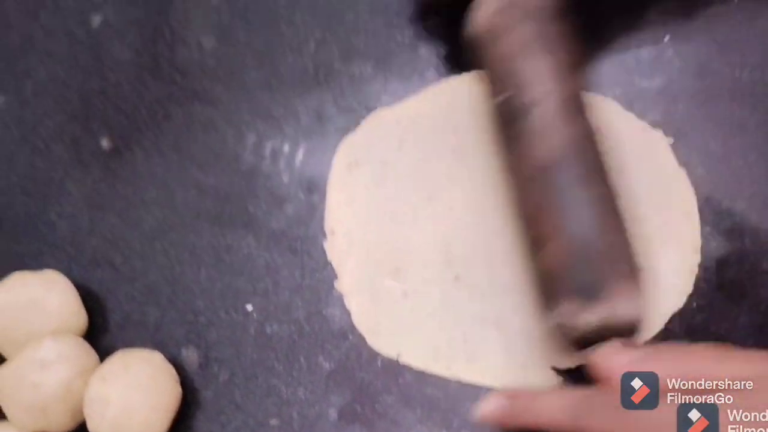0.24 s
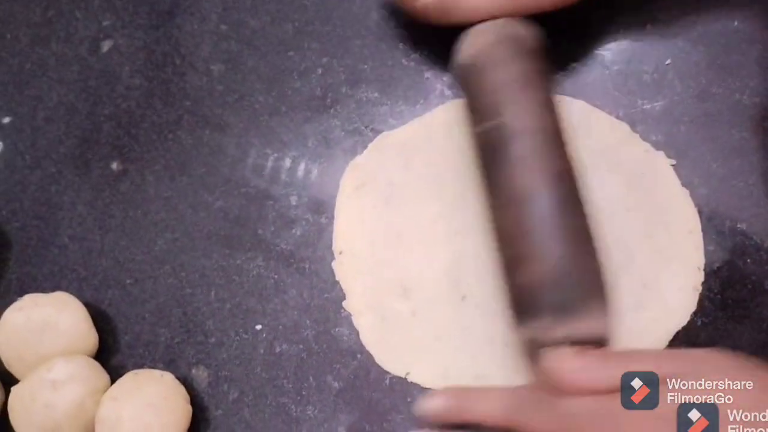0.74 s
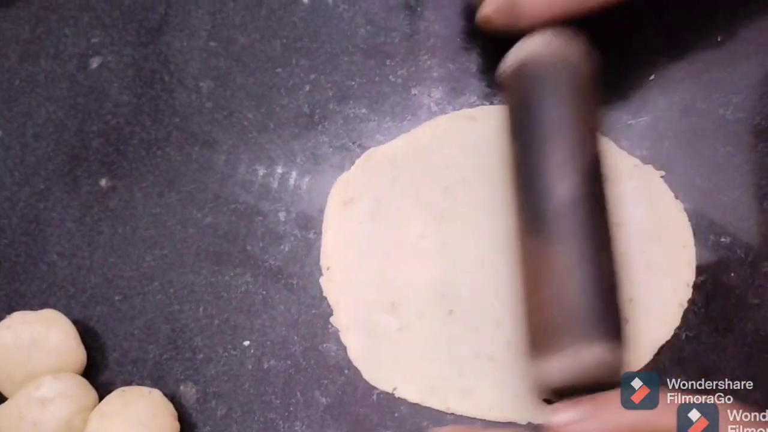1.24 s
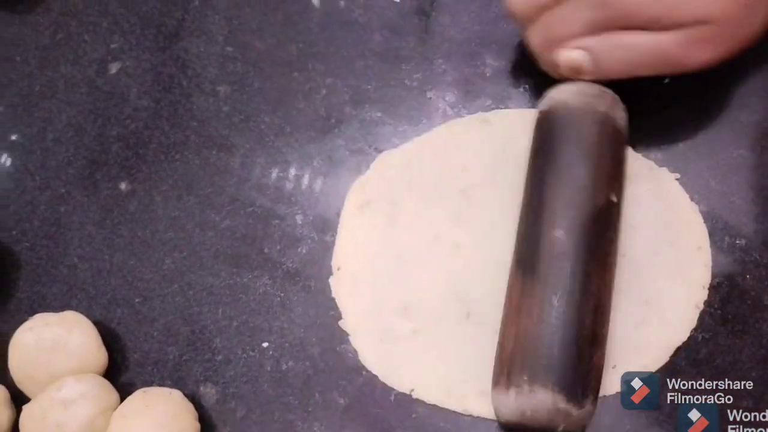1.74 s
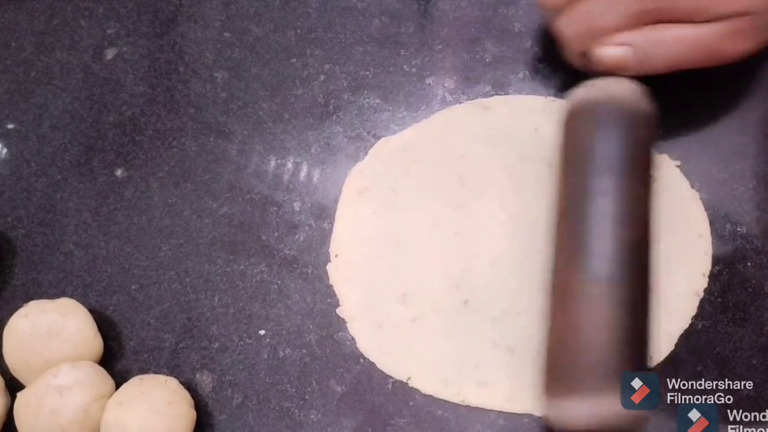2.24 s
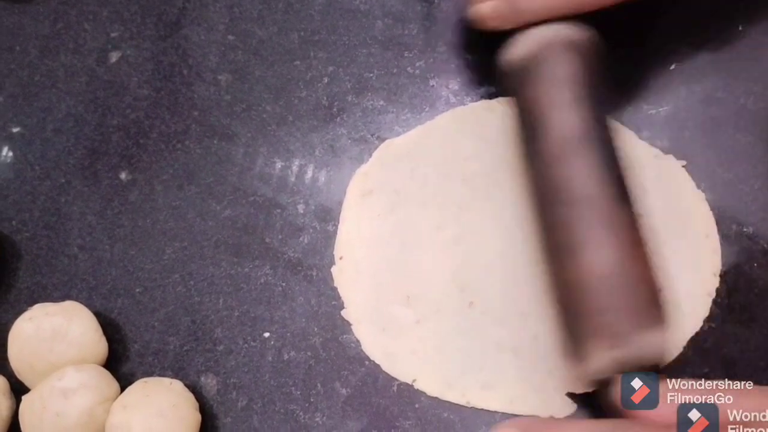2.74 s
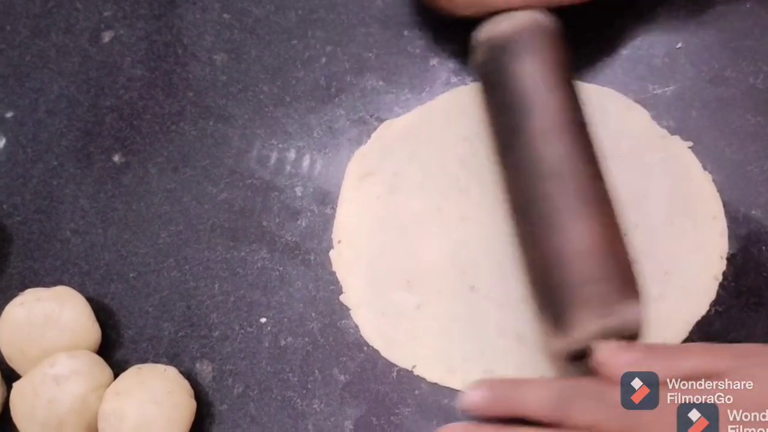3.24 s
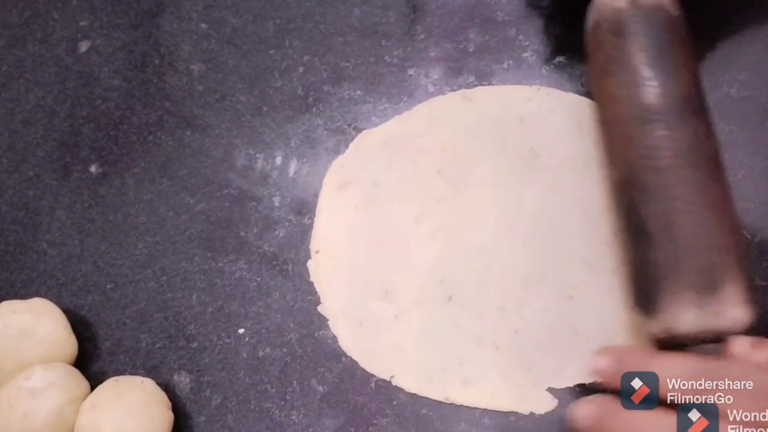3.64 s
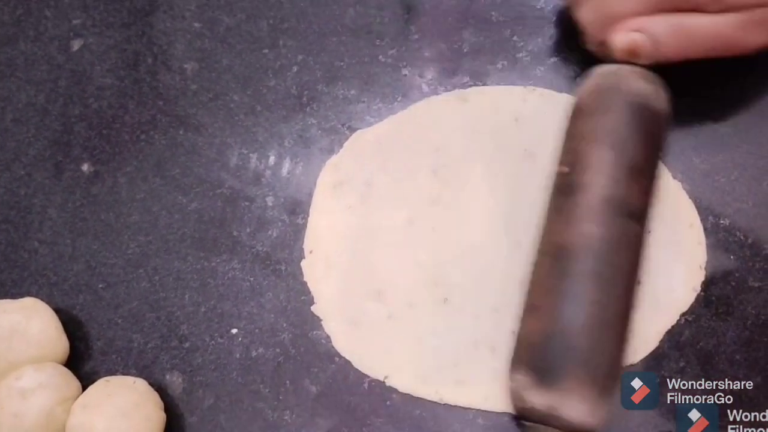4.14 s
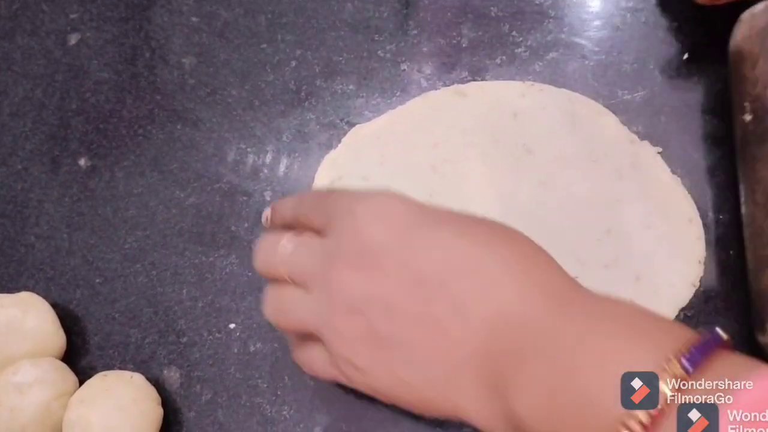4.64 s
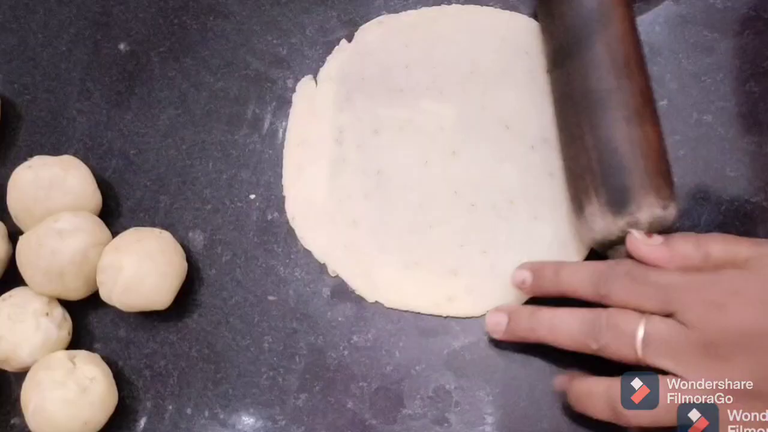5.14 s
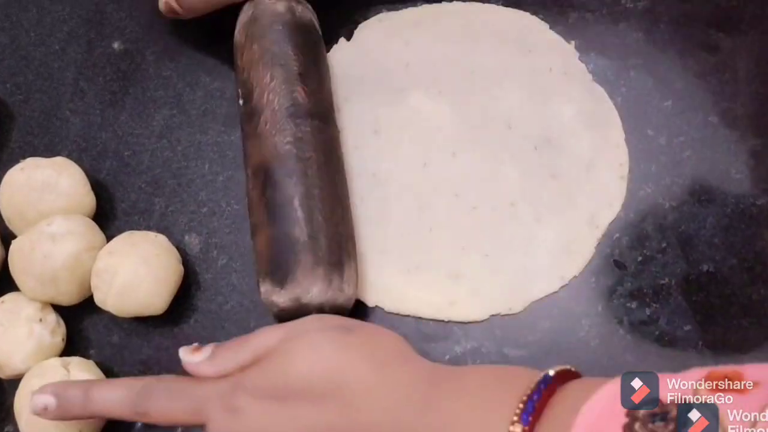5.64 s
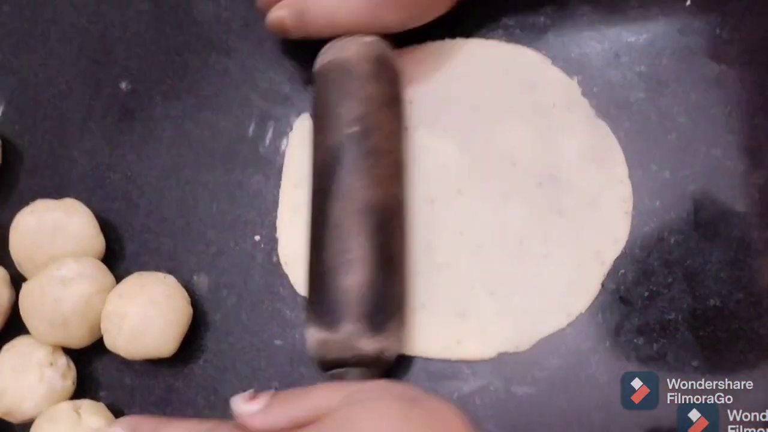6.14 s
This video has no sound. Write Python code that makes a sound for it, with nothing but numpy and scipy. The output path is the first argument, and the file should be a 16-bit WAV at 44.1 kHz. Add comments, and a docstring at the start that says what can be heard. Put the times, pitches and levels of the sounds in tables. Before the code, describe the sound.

A wooden rolling pin knocks unevenly on a stone counter over an appliance hum in an echoing kitchen, with faint bangle clicks.

```python
"""A bare, echoing kitchen, heard on a stereo microphone. A wooden rolling pin knocks on a stone counter,
a little nearer the right port; pin and counter ring briefly together and the room answers.
Bangles click, each click followed by a diffuse, fluttering ring near 7.5 kHz on the right.
A broad appliance hum fills the room and feeds its two lowest standing waves, which boom after each knock.
Near the end the sound cuts out for a moment and fades back in."""
import sys
import numpy as np
from scipy import signal
from scipy.fft import rfft, irfft
from scipy.io import wavfile
from scipy.ndimage import uniform_filter1d

SR = 44100
rng = np.random.default_rng(int(sys.argv[2]) if len(sys.argv) > 2 else 0)


def unload_audio(sound):
    """Save the sound as a 16-bit wav file, at the path given as the first command line argument."""
    columns = np.transpose(np.atleast_2d(sound))
    # keep every value between -1 and 1, then stretch to whole-number steps
    steps = np.round(np.clip(columns, -1, 1) * 32767)
    wavfile.write(sys.argv[1], SR, steps.astype(np.int16))


N = 281358

# appliance spectrum: (frequency [Hz], relative density [dB])
HUM_SPECTRUM = [(15, -44.5), (55, -30.5), (85, -7.5), (120, -11.5), (200, -5.5), (300, -6), (420, -12),
                (750, -12), (1500, -17), (3000, -28.5), (5700, -48), (7500, -45), (10000, -49),
                (15600, -52)]
# hum in the room: (time [s], level [dB])
HUM_LEVELS = [(0, -42.5), (1, -42), (4, -41.5), (5.2, -42.5), (5.7, -41), (6.38, -41)]
# standing waves, the two that drone first: (frequency [Hz], width [Hz], gain [dB])
ROOM_MODES = [(145, 3.1, 5), (86.4, 4.4, 10.5), (215.2, 12.7, 9), (254, 6.2, -2), (297.3, 10, 12),
              (378, 10, 7), (501.7, 8.5, 9.5), (580, 10, -1), (619, 10, -2), (740.5, 9, 7.5),
              (794, 5.6, 6.5), (852, 10, 0)]
# upper droning wave between knocks: (time [s], level [dB])
UPPER_WAVE_LEVELS = [(0, -47.5), (.3, -47), (.75, -43), (.97, -46.5), (1.14, -40.5), (1.28, -56),
                     (1.6, -36.5), (1.9, -44.5), (2.22, -39), (2.5, -50.5), (2.8, -42), (3.2, -45.5),
                     (3.8, -46), (4.1, -47.5), (4.33, -40.5), (4.75, -43), (5.0, -58), (5.12, -47.5),
                     (5.8, -43.5), (6.0, -66), (6.3, -44)]
# boom of the upper, then the lower wave: (build-up [s], t60 [s], level against the knock's boom [dB])
BOOM_SHAPES = [(.08, .4, 0), (.02, 0.95, -1)]
# bangles touching: (time [s], peak before panning [dB], rattle centre [Hz], rattle width [Hz],
# after-ring against the peak [dB], rattle length [s])
BANGLE_TOUCHES = [(0.057, -48.5, 5000, 4000, -38, 0.004), (.621, -48.5, 4960, 4000, -28, 0.0062),
                  (.996, -51.5, 5900, 4000, -29, 0.0039), (1.037, -38.5, 7700, 12200, -17, 0.0077),
                  (2.571, -47, 7600, 3500, -38, 0.0073), (2.669, -59.5, 7900, 2953, -35, .012),
                  (3.082, -50.5, 6000, 5000, -27, 0.0041), (3.102, -42.5, 8040, 7000, -21, 0.01),
                  (3.508, -54.5, 5400, 3950, -22, 0.0062), (3.566, -49, 7900, 7000, -34, 0.014),
                  (4.204, -55, 7000, 4980, -28, 0.0046)]
# diffuse ring heard on the right after each click: (frequency [Hz], relative level [dB], t60 [s])
AFTER_RING = [(7305, -13.5, 0.21), (7670, 1, 0.3), (7300, -3.5, .3), (8680, 0.5, .1), (14200, -8, 0.1)]
# diffuse room tail: (frequency [Hz], t60 [s], relative level [dB])
ROOM_TAIL = [(59.3, 1, -9), (160, 0.814, 2.5), (420, 0.63, 1), (1037, 0.68, 1), (1870, 0.74, -10.5),
             (2900, 0.93, -4.5), (7540, 0.6, 3.5), (15000, 0.28, 0)]
# first echoes off the walls: (delay [s], relative level [dB])
WALL_ECHOES = [(0.023, -15.5), (0.028, -13.5), (.036, -13)]
# pin against stone: (time [s], wood peak [dB], hardness as low-pass cutoff [Hz], lowest mode's boost [dB],
# crack [dB], treble tick [dB], room gain [dB], standing-wave boom [dB])
PIN_BLOWS = [(.385, -18, 325, 5, -60, -56, 2, -43), (0.472, -35.5, 295, 14, -67, -78, 18.5, -51),
             (1.3613, -3, 1330, 1.5, -21, -46, 5.5, -36), (2.8947, -10.5, 670, 5, -35, -54, 3.5, -37),
             (3.8648, -5.5, 1120, 2, -21.5, -47.5, 4.5, -37), (4.719, -22, 1070, -8, -50, -72, 5.5, -56),
             (4.766, -25.5, 1090, -9.5, -52, -74, 5.5, -66), (4.794, -29, 1400, -0.5, -59, -78, -3, -69),
             (4.821, -34, 499, -3, -65, -78, 1, -73), (5.236, -37, 250, -6, -72, -82, 1, -44)]
# pin and counter, quickly damped by hands and dough: (frequency [Hz], relative level [dB], t60 [s])
PIN_MODES = [(262.6, -5, 0.025), (411, -18, 0.0071), (536, -9.5, 0.047), (813, 0, 0.017), (1167, 5, 0.0077),
             (1463, 1, 0.018), (1988, -1.5, 0.052), (2220, -20, .015), (2750, -24.5, 0.011)]
# diffuse sound at the microphone: (frequency [Hz], left-right correlation [-1 to 1])
PORT_LIKENESS = [(60, 0.9), (110, 1), (200, 0.92), (380, 0.89), (700, 0.48), (1290, -0.062), (2380, 0.079),
                 (4400, -0.11), (8120, 0.05), (15000, -0.098)]
# colour of the microphone ports: (frequency [Hz], left minus right [dB])
PORT_BALANCE = [(60, 1.5), (110, -2.5), (200, -1), (380, 2.5), (700, -2.5), (1290, -0.5), (2380, -0.5),
                (4400, -7.5), (8120, -7), (15000, 1.5)]

LOWER_WAVE_DB = -56.5
SPLASHBACK_S, SPLASHBACK_DB = 0.003325, -1.5  # the nearest hard surface returns each blow, duller
CUT_S, RETURN_S, FADE_IN_S = 5.2695, 5.611, 0.063
BAND_LIMIT_HZ = 15700


def gain_of(db):
    """Decibels to gain."""
    return 10 ** (np.asarray(db) / 20)


def unit_rms(x):
    """Scales to rms 1."""
    return x / np.sqrt(np.mean(x ** 2) + 1e-20)


def spectrum_at(points, hz):
    """Reads a spectrum table on a log-frequency axis."""
    f, value = np.transpose(points)
    return np.interp(np.log(hz + 1), np.log(f + 1), value)


def level_curve(rows):
    """A level for every sample."""
    return np.interp(np.arange(N) / SR, *np.transpose(rows))


def add(mix, s, sound):
    """Mixes a sound in at s seconds."""
    part = mix[round(s * SR):][:len(sound)]
    part += sound[:len(part)]


def resonate(x, hz, width):
    """A resonance of gain 1 at its centre."""
    return signal.lfilter(*signal.iirpeak(hz, hz / width, SR), x)


def ring(modes, t, detune):
    """Dying sines, each detuned by its own factor."""
    return sum(gain_of(db - 60 * t / t60) * np.sin(2 * np.pi * hz * k * t)
               for (hz, db, t60), k in zip(modes, detune))


def diffuse(count, size, colour_db):
    """Noise from all around: alike at both ports in the bass, unrelated in the treble."""
    hop = size // 4
    hz, t = np.fft.rfftfreq(size, 1 / SR), np.arange(count // hop + 5) * hop / SR
    a, b, c, d = rng.standard_normal((len(t), len(hz), 4)).T
    left, unrelated = a + 1j * b, c + 1j * d
    likeness = np.clip(spectrum_at(PORT_LIKENESS, hz), -1, 1)[:, None]
    right = likeness * left + np.sqrt(1 - likeness ** 2) * unrelated
    spectra = np.array([left, right]) * gain_of(colour_db(hz[:, None], t))
    return signal.istft(spectra, nperseg=size, noverlap=size - hop)[1][:, :count]


def appliance_hum():
    """Broad appliance noise all around the microphone, with faint drifting patches of colour."""
    def colour_db(hz, t):
        drift = uniform_filter1d(rng.standard_normal((len(t), len(hz))), size=9, axis=0)
        patches = uniform_filter1d(drift, size=15, axis=1)
        return spectrum_at(HUM_SPECTRUM, hz) + 0.95 * unit_rms(patches).T
    return gain_of(level_curve(HUM_LEVELS)) * unit_rms(diffuse(N, 2048, colour_db))


def standing_waves():
    """The room's two lowest waves as wavering tones, alike at both ports; each knock makes them boom."""
    out, t = 0, np.arange(SR) / SR
    levels = level_curve(UPPER_WAVE_LEVELS), LOWER_WAVE_DB
    for (hz, width, _), base_db, (rise, t60, db) in zip(ROOM_MODES, levels, BOOM_SHAPES):
        swell = np.minimum(t / rise, 1) ** 2 * gain_of(db - 60 * np.maximum(t - rise, 0) / t60)
        boom = np.zeros(N)
        for s, *_, boom_db in PIN_BLOWS:
            add(boom, s, gain_of(boom_db) * swell)
        waver_hz = width * .5 * unit_rms(uniform_filter1d(rng.standard_normal(N), size=6000))
        out = out + (gain_of(base_db) + boom) * np.sin(2 * np.pi * np.cumsum(hz + waver_hz) / SR)
    return out


def bangle_clicks():
    """Well to the right, bangles click; a diffuse, fluttering ring near 7.5 kHz follows each click."""
    out, t = np.zeros(N), np.arange(16000) / SR
    for s, peak_db, hz, width, ring_db, length in BANGLE_TOUCHES:
        rattle = rng.standard_normal(len(t)) * np.exp(-(t / length) ** 2) * np.minimum(t / 0.0032, 1)
        rattle = resonate(signal.lfilter(*signal.butter(3, 3600, "high", fs=SR), rattle), hz, width)
        rattle = signal.lfilter(*signal.butter(1, hz + width / 2, fs=SR), rattle)
        flutter = 0.341 + unit_rms(uniform_filter1d(rng.standard_normal(len(t)), size=150))
        detune = 1 + 0.0011 * rng.standard_normal(len(AFTER_RING))
        tone = flutter * ring(AFTER_RING, t, detune)
        add(out, s, gain_of(peak_db) * (rattle / abs(rattle).max() + gain_of(ring_db) * tone))
    return out * gain_of([[-9], [3]]) + kitchen_echo(out, wet_db=-5) * gain_of([[-3], [1.5]])


def kitchen_echo(x, wet_db):
    """The bare room answers: dull first echoes, a tail dying band by band, and ringing standing waves."""
    def decay_db(f, t):
        hz, t60, db = np.transpose(ROOM_TAIL)
        return spectrum_at(np.c_[hz, db], f) - 60 * t / spectrum_at(np.c_[hz, t60], f)
    tail = diffuse(SR, 512, decay_db)
    tail *= np.clip(np.arange(SR) / SR / 0.0034, 0, 1)  # reflections build up
    lows = signal.lfilter(*signal.butter(2, 1000, fs=SR), tail[0])
    tail /= np.linalg.norm(lows) * np.sqrt(SR / 2000)  # about unit gain below 1 kHz
    dull_pulse = signal.windows.hann(15) / 7
    for delay, db in WALL_ECHOES:
        tail[:, round(delay * SR):][:, :len(dull_pulse)] += gain_of(db) * dull_pulse
    waves = sum(gain_of(db) * resonate(x, hz, width) for hz, width, db in ROOM_MODES)
    return gain_of(wet_db) * signal.oaconvolve(x[None], tail, axes=1)[:, :N] + waves


def pin_knock(s, peak_db, hard_hz, thud_db, crack_db, tick_db, wet_db):
    """Wood rings on stone; a soft blow stays longer in contact and is duller. Each spot has its echo."""
    (body, into_room), snap, t = np.zeros((2, N)), np.zeros((2, N)), np.arange(4000) / SR
    (hz, db, t60), *upper = PIN_MODES
    detune = 1 + .02 * rng.standard_normal(len(PIN_MODES))
    wood = -ring([(hz, db + thud_db, t60), *upper], t, detune)
    wood = signal.lfilter(*signal.butter(3, hard_hz, fs=SR), wood)
    wood = signal.sosfilt(signal.butter(3, 110, "high", fs=SR, output="sos"), wood)  # too small for bass
    wood = gain_of(peak_db) * wood / abs(wood).max()
    add(body, s, wood)
    # summed over all directions the modes blur: the room hears mainly the start of the blow
    add(into_room, s, wood * np.exp(-(t / 0.0038) ** 2))
    for port in snap:  # the crack comes from all along the pin and differs between the ports
        crack = gain_of(crack_db) * contact_noise(t, rise_s=0.0028, hz=1900, width=1300)
        tick = gain_of(tick_db) * contact_noise(t, rise_s=0.00158, hz=7700, width=9000)
        add(port, s, crack + tick)
    bounce = signal.lfilter(*signal.butter(1, 1500, fs=SR), np.roll(body, round(SPLASHBACK_S * SR)))
    right = body + gain_of(SPLASHBACK_DB) * bounce
    left = np.roll(right, shift=11)  # the farther port hears the blow a few samples later
    return np.array([left, right]) + snap + kitchen_echo(into_room + gain_of(-10.5) * snap[0], wet_db)


def contact_noise(t, rise_s, hz, width):
    """Wood meeting stone: a band of noise that rises and quickly dies."""
    noise = rng.standard_normal(len(t)) * t / rise_s * np.exp(1 - t / rise_s)
    return resonate(resonate(noise, hz, width), hz, width)


def scene():
    """Knocks and clicks over the hum of the kitchen, as they reach the microphone."""
    knocks = sum(pin_knock(*blow[:-1]) for blow in PIN_BLOWS)
    return knocks + bangle_clicks() + appliance_hum() + standing_waves()


def record(dry):
    """The microphone's two ports of unlike colour, a brief dropout, then the band limit."""
    tilt_db = spectrum_at(PORT_BALANCE, np.fft.rfftfreq(N, 1 / SR)) / 2
    ports = irfft(rfft(dry) * gain_of([tilt_db, -tilt_db]), N)
    t = np.arange(N) / SR
    cut_out = np.clip((CUT_S - t) / .002 + .5, 0, 1)
    fade_in = np.clip((t - RETURN_S) / FADE_IN_S, 0, 1) ** 0.72
    heard = ports * np.where(t < RETURN_S, cut_out, fade_in)
    low_pass = signal.firwin(511, BAND_LIMIT_HZ, window=("kaiser", 9), fs=SR)
    return signal.oaconvolve(heard, low_pass[None], "same")


dry = scene()
out = record(dry)
unload_audio(out)
```